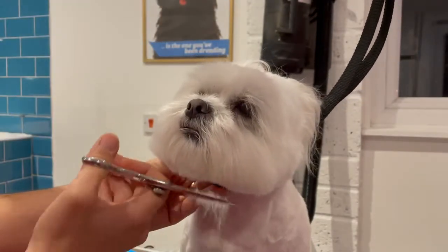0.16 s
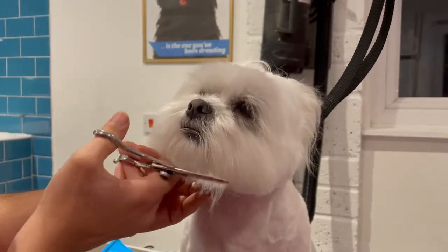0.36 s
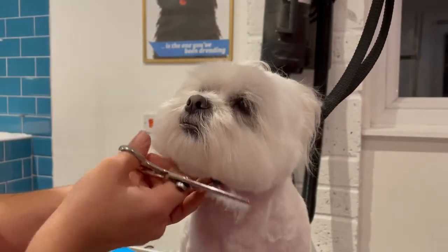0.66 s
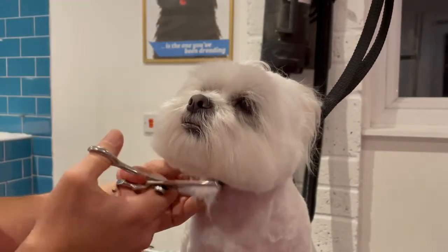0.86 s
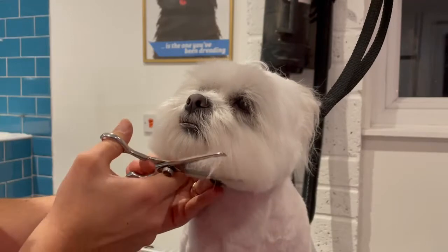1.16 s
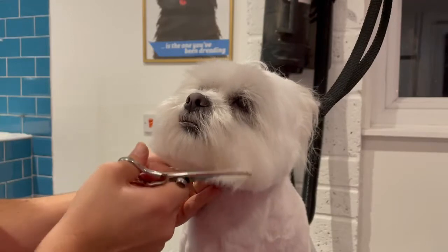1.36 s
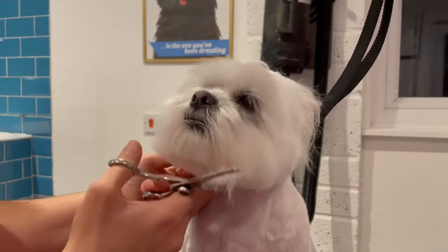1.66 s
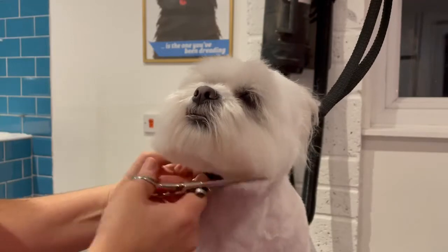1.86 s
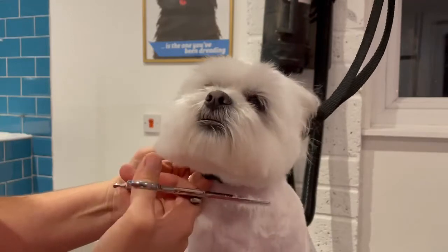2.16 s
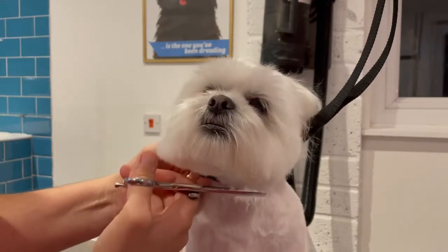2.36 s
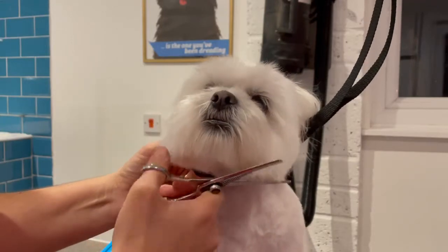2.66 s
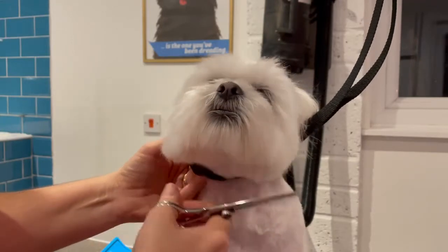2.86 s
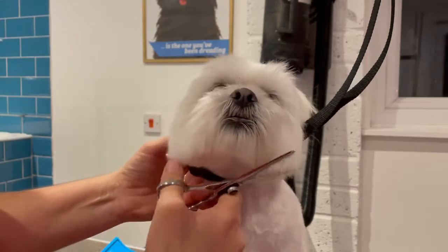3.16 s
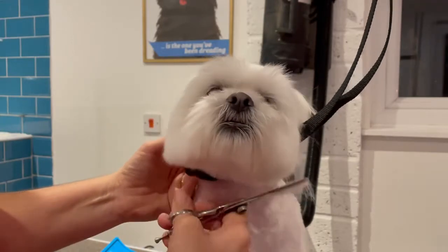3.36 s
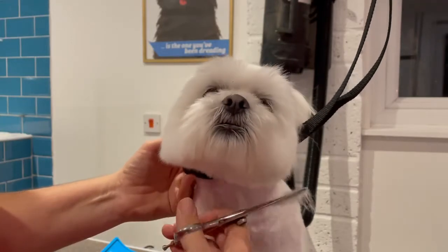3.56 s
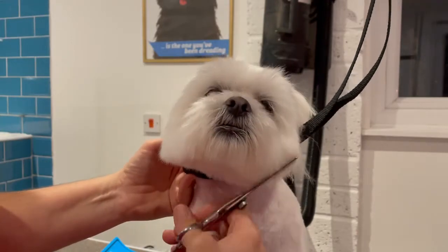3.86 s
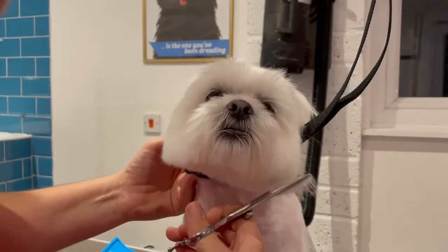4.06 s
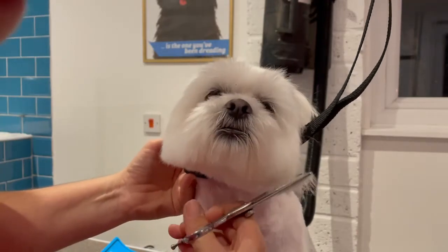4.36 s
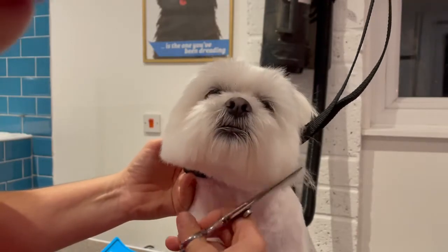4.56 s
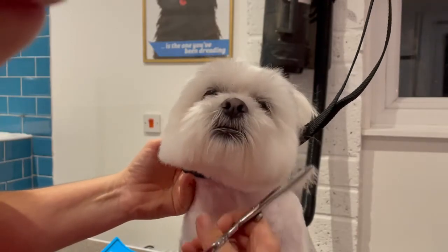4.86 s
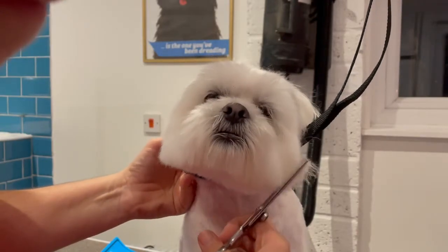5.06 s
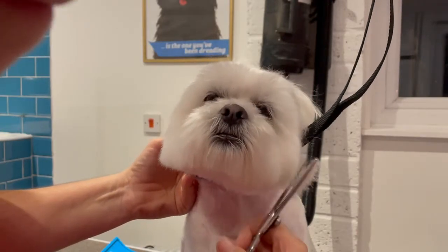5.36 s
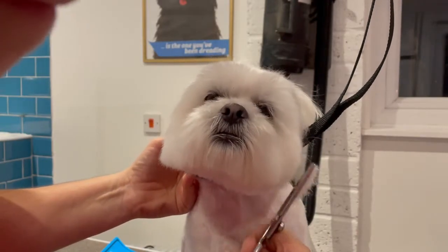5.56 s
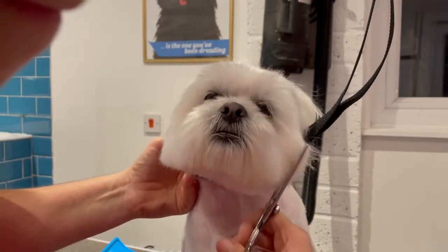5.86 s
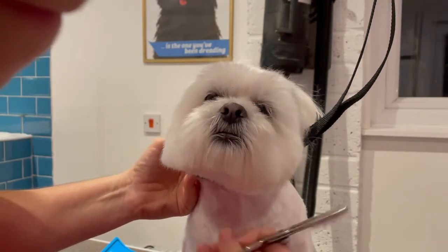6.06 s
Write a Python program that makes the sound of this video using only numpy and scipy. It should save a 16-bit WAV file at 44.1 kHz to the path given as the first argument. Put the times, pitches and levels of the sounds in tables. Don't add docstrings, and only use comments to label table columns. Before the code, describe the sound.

Sharp metallic scissor snips crunch through fine fur, ten spaced cuts with light opening scrapes, dull handle knocks and tiny clinks in a quiet tiled room.

```python
import sys
import numpy as np
from scipy import signal
from scipy.fft import rfft, irfft, next_fast_len
from scipy.io import wavfile
from scipy.ndimage import uniform_filter1d

SR = 44100
rng = np.random.default_rng(int(sys.argv[2]) if len(sys.argv) > 2 else 0)


def transcribe(u):
    v = np.clip(np.atleast_2d(u).T, -1, 1)
    q = np.round(v * 32767).astype(np.int16)
    wavfile.write(sys.argv[1], SR, q)


def field_ratio(decibels):
    return 10 ** (np.asarray(decibels, dtype=float) / 20)


N = 274302


def evened(x):
    return x / np.sqrt(np.mean(x ** 2) + 1e-20)


def read(points, hz):
    f, value = np.transpose(points)
    return np.interp(np.log(hz + 1), np.log(f + 1), value)


def along(curve):
    return np.interp(np.arange(N) / SR, *np.transpose(curve))


def add(mix, s, sound):
    part = mix[round(s * SR):][:len(sound)]
    part += sound[:len(part)]


def wander(size):
    knots = rng.standard_normal(N // size + 2)
    return np.interp(np.arange(N) / size, np.arange(len(knots)), knots) * 0.79


def wash(spectrum, level_db, patchy_db, size):
    frames, hz = 4 * N // size + 5, np.fft.rfftfreq(size, 1 / SR)
    draw = rng.standard_normal((5, frames, len(hz)), dtype=np.float32)
    patches = uniform_filter1d(uniform_filter1d(draw[4], size=10, axis=1), size=8, axis=0)
    colour = field_ratio(read(spectrum, hz) + patchy_db * evened(patches))
    z = (draw[:2] + 1j * draw[2:4]) * colour
    noise = signal.istft(z, nperseg=size, noverlap=3 * size // 4, time_axis=1, freq_axis=2)[1]
    return evened(noise[:, :N]) * field_ratio(level_db)


# f/Hz, level/dB per Hz
RUMBLE_COLOUR = [(28, -81), (37, 5), (47, -10), (60, -9.5), (85, -14.5), (120, -28), (200, -45), (400, -75)]
# t/s, level/dB
BUILDING_SWELL = [(0.0, -80), (0.08, -71), (0.22, -88), (0.26, -66), (0.69, -84.5), (0.73, -68),
                  (0.81, -79.5), (2.48, -62), (2.55, -65.5), (3.33, -56), (4.42, -64.5), (5.01, -60),
                  (5.26, -68), (5.3, -56), (5.37, -62.5), (5.94, -59.5), (6.08, -70), (6.22, -53)]


def rumble():
    level_db = along(BUILDING_SWELL) + 3.5 - 1.2 * wander(size=5000)
    return wash(RUMBLE_COLOUR, level_db, 1.57, size=4096)


# f/Hz, level/dB per Hz
HISS_COLOUR = [(200, -2), (700, -1), (1400, -3.5), (2400, 0.5), (3500, -6), (6500, -9.5), (9000, -4.5),
               (11000, -7.5), (15000, -8), (17000, -22)]
# t/s, level/dB
HAND_MOTION = [(0.0, -76), (0.05, -63), (0.24, -77.5), (0.52, -76), (1.28, -74.5), (1.4, -73), (2.16, -68),
               (2.46, -64), (2.98, -67.5), (3.45, -65), (4.45, -69.5), (4.71, -65), (5.01, -61),
               (5.68, -73), (5.8, -67), (6.22, -57)]


def hiss():
    steady_db, sweep_db, sweep_s, follows = -72.5, 18, 0.43, 0.1
    t, hands_db = np.arange(N) / SR, along(HAND_MOTION)
    arm_db = sweep_db * np.exp(-(t / sweep_s) ** 2)
    motion_db = follows * (hands_db - hands_db.mean())
    return wash(HISS_COLOUR, steady_db + arm_db + motion_db, 1.43, size=512)


# f/Hz, level/dB per Hz
RUSTLE_COLOUR = [(60, -32), (130, 2), (300, -6), (600, -9), (1200, -13.5), (2500, -24), (5000, -112)]


def rustle():
    return wash(RUSTLE_COLOUR, along(HAND_MOTION) + 2.5, 3.5, size=1024)


# f/Hz, t60/s
ROOM_DECAY = [(300, 0.47), (1500, 0.48), (4000, 0.4), (8000, 0.39), (14000, 0.22)]


def room(x, wet_db, scatter_s=0.001):
    slots = np.arange(200, SR // 2 - 20, 20)
    at = slots + rng.integers(0, 20, (2, len(slots)))
    taps = np.zeros((2, SR // 2))
    np.put_along_axis(taps, at, rng.choice([-1., 1.], at.shape), axis=1)
    hz, t, z = signal.stft(taps, SR, nperseg=256)
    decay = field_ratio(-60 * t / read(ROOM_DECAY, hz)[:, None])
    tail = signal.istft(z * decay, SR, nperseg=256)[1]
    tail *= field_ratio(wet_db) / np.linalg.norm(tail[0])
    scatter = rng.standard_normal(200) * np.exp(-np.arange(200) / SR / scatter_s)
    tail[0, 0] += 1
    tail[1, :200] += scatter / np.linalg.norm(scatter)
    return signal.fftconvolve(x[None], tail, axes=1)[:, :N]


def rattle(hz, t60, width, strike, size=8000):
    shake = rng.standard_normal(size) * field_ratio(-60 * np.arange(size) / SR / t60)
    shake[0] = strike
    r, turn = np.exp(-np.pi * width / SR), 2 * np.pi * hz / SR
    gain = 2 * (1 - r) ** 0.75 * np.sin(turn)
    section = [gain, 0, 0, 1, -2 * r * np.cos(turn), r * r]
    return signal.sosfilt([section, section], shake)


# f/Hz, level/dB, t60/s
CLASP_LOW_MODES = [(2397, -5.5, 1), (2553, -13.5, 0.12), (4530, 3, 0.057), (5360, -6, 0.11),
                   (5630, -7.5, 0.36), (5830, 0, 0.29), (6770, -5, 0.13)]
# f/Hz, level/dB, t60/s
CLASP_HIGH_MODES = [(8060, -22, 0.42), (9100, 4, 0.24), (10200, -15.5, 0.16), (9740, -3, 0.45),
                    (10200, -29, 0.1), (11300, -20, 0.066)]
# t/s, peak level/dB, upper modes level/dB, damping/factor
CLASP_CLINKS = [(1.9999, -46, 11.5, 9.9), (2.2044, -47.5, 12, 2.1), (2.4064, -52, 11, 1.2),
                (2.7574, -49.5, 11, 1.1), (3.1394, -51, 5.5, 1.1), (3.4706, -63.5, 12, 1.2),
                (3.9675, -62.5, 14, 3.2), (4.1026, -52, 9.5, 2.9), (4.6169, -48.5, 10, 4.3),
                (4.8, -57.5, -7, 2.3), (4.993, -51, 9, 2.7), (5.5599, -49, 11, 1.4),
                (6.0548, -46.5, 5, 2.3)]


def clasp():
    jangle_db, jangle_s = -17, 0.17
    out, modes = np.zeros(N), CLASP_LOW_MODES + CLASP_HIGH_MODES
    shares = rng.standard_normal((len(CLASP_CLINKS), len(modes)))
    for (s, db, high_db, damping), luck in zip(CLASP_CLINKS, shares):
        for k, (hz, mode_db, t60) in enumerate(modes):
            upper_db = high_db * (k >= len(CLASP_LOW_MODES))
            start_db = db - 14.0 + mode_db + 2.2 * luck[k] + upper_db
            add(out, s, field_ratio(start_db) * rattle(hz, t60 / damping, 250, 31.2))
        jangle = rattle(hz=6400, t60=jangle_s / damping, width=6500, strike=20.0)
        add(out, s, field_ratio(db + jangle_db) * jangle)
    return out


def blow(db, hz, t60, puff_share, sag, size=6000):
    t, noise = np.arange(size) / SR, rng.standard_normal(size)
    pitch = hz * (1 + sag * np.exp(-t / 0.003))
    tone = np.sin(2 * np.pi * np.cumsum(pitch) / SR)
    puff = evened(uniform_filter1d(noise, size=24) - uniform_filter1d(noise, size=150))
    onset = 1 - np.exp(-t / 0.00069)
    return field_ratio(db - 60 * t / t60) * onset * (tone + puff_share * puff)


# t/s, peak level/dB, pitch f/Hz, t60/s
RING_THUDS = [(0.533, -53.5, 692, 0.043), (1.246, -45, 127, 0.058), (1.298, -49.5, 847, 0.1),
              (1.795, -55.5, 202, 0.048), (2.408, -47.5, 197, 0.14), (2.758, -54, 348, 0.14),
              (3.255, -53.5, 640, 0.17), (4.552, -42, 279, 0.056), (4.986, -38.5, 278, 0.043),
              (5.468, -49.5, 290, 0.099), (5.867, -49, 458, 0.12), (6.133, -46, 242, 0.22),
              (6.153, -53, 110, 0.18), (6.186, -54, 104, 0.057), (6.165, -68, 314, 0.081)]


def thuds():
    out = np.zeros(N)
    for s, db, hz, t60 in RING_THUDS:
        add(out, s, blow(db, hz, t60, 0.6, 0.91))
    return out


# t/s, peak level/dB, pitch f/Hz, t60/s, blade ring level/dB
HANDLE_KNOCKS = [(1.287, -48.5, 1295, 0.12, -41), (1.781, -44.5, 1166, 0.12, -47),
                 (2.744, -44.5, 612, 0.081, -47.5), (3.257, -38, 138, 0.028, -45),
                 (3.969, -52, 141, 0.081, -76), (4.546, -33, 287, 0.016, -44),
                 (4.908, -44.5, 125, 0.041, -71), (5.465, -40, 1396, 0.038, -45.5),
                 (5.636, -54, 158, 0.061, -76), (5.857, -44, 1435, 0.08, -39),
                 (6.133, -48.5, 111, 0.11, -86)]


def knocks():
    out = np.zeros(N)
    for s, db, hz, t60, ring_db in HANDLE_KNOCKS:
        add(out, s, blow(db, hz, t60, 0.67, 0.34))
        low_ring = rattle(hz=3500, t60=0.28, width=480, strike=4.0)
        high_ring = rattle(hz=9800, t60=0.53, width=700, strike=4.0)
        add(out, s, field_ratio(ring_db - 7.0) * (low_ring + 0.41 * high_ring))
    return out


# bite t/s, cut length t/s, level at the stop/dB, swell level/dB, release t/s
FUR_CUTS = [
    (0.483, 0.024, -45, 11.5, 0.092),
    (1.251, 0.039, -27.5, 22, 0.015),
    (1.752, 0.042, -31.5, 14.5, 0.016),
    (2.697, 0.026, -34.5, 22.5, 0.072),
    (3.225, 0.033, -33.5, 1.5, 0.013),
    (3.732, 0.033, -41.5, 4, 0.051),
    (4.507, 0.0414, -31.5, 5, 0.011),
    (4.932, 0.032, -40.5, -4, 0.019),
    (5.437, .016, -33.5, 0.5, 0.06),
    (5.827, 0.028, -30.5, 8, 0.069),
]
# start t/s, slide length t/s, level/dB, swell level/dB, bite level of the lowest modes/dB
BLADE_OPENINGS = [(0.736, 0.05, -54.5, 0.5, -5.5), (0.973, 0.044, -64.5, 4, -1.5),
                  (1.474, 0.021, -50.5, 9, -9.5), (1.954, .024, -47, -1.5, -14.5),
                  (2.895, 0.019, -43, 9, -14.5), (3.427, 0.033, -45.5, 3.5, -21.5),
                  (3.963, .004, -43, 13, -18), (4.687, .02, -40, -2, -23.5),
                  (4.982, 0.0023, -41.5, -14, -4), (5.129, 0.025, -41, 17, -13.5),
                  (5.626, 0.022, -39, 16, -15.5), (6.036, 0.03, -51, 0.5, -5.5)]
LOW_BITE_SHAPE = (5, 6, -2, 2.5, 3, -12)
SPINE_STAGES = (-22, -20, -13, -11, -7, -8.5)
# t/s, middle modes level/dB
BLADE_FACING = [(0.5, 9), (1.8, 5.5), (2.7, 4), (4.0, 0), (5.1, 0.5), (5.9, 0)]


def strokes():
    cut_lead_s, open_lead_s, open_release_s, drag_s = 0.026, 0.0078, 0.05, 0.11
    apart_db, touch_db, slack_db, drag_db = -88, -64, -74, -77
    approach = 1.5
    rows = []
    for start, length, db, swell_db, release in FUR_CUTS:
        bite_db = -13 + 0.05 * (db + 45.5)
        rows.append((start, length, db, swell_db, cut_lead_s, release, bite_db))
    for start, length, db, swell_db, bite_db in BLADE_OPENINGS:
        rows.append((start, length, db, swell_db, open_lead_s, open_release_s, bite_db))
    levels, travel, t = np.zeros((3, N)), np.zeros(N), np.arange(N) / SR
    for start, length, db, swell_db, lead, release, bite_db in rows:
        steps = [-lead - approach * lead, approach * lead, lead, length, release, drag_s]
        s = start + np.cumsum(steps)
        level_db = np.array([apart_db, touch_db, db - swell_db, db, slack_db, drag_db])
        span = slice(round(s[0] * SR), round(s[-1] * SR))
        spine_db = SPINE_STAGES + np.interp(start, *np.transpose(BLADE_FACING))
        groups_db = (0, spine_db, np.add(LOW_BITE_SHAPE, bite_db))
        levels[:, span] += [field_ratio(np.interp(t[span], s, level_db + share_db)) for share_db in groups_db]
        travel[span] = np.interp(t[span], s[[0, -1]], [-1, 1])
    return levels, travel


def resonate(x, turns, width):
    spin, r = np.exp(2j * np.pi * turns), np.exp(-np.pi * width / SR)
    gain = np.sqrt(2 * (1 - r ** 2) ** 3 / (1 + r ** 2))
    smooth = signal.lfilter([1], np.poly([r, r]), x * spin.conj())
    return gain * (spin * smooth).real


# t/s, peak level/dB, lower modes level/dB
EDGE_CATCHES = [(0.4973, -22, -31), (0.741, -17, -21), (1.0138, -79, -21), (1.2555, -20, -15),
                (1.277, -34, -20), (1.2895, -10, -23), (1.4945, -20.5, -25), (1.757, -36, -35),
                (1.7863, -4, -22), (3.2543, -32, -22), (1.954, -42, -15), (2.7176, -32, -26),
                (2.8935, -19.5, -12), (2.9096, -20, -24), (3.2201, -45, -29), (3.4271, -39, 8),
                (5.1385, -23, -19), (3.7154, -21.5, -8), (3.7469, -15.5, -37), (3.9705, -8.5, -31),
                (0.537, -22, -24), (4.6807, -18.5, -28), (4.6902, -24, -14), (4.9087, -30, -30),
                (4.9287, -20, -27), (4.9604, -31, -29), (5.4634, -15.5, -2.5), (5.6363, -19, -15),
                (6.0413, -22, -2.5), (6.1276, -18, 1)]
# f/Hz, width f/Hz, level/dB
EDGE_RESONANCES = [(9060, 1600, -13.5), (9750, 1700, 1), (10850, 1020, 1), (11620, 250, -7.5),
                   (11880, 1080, -1), (13150, 490, 2), (14770, 1200, -1), (15800, 390, -11.5)]
# f/Hz, width f/Hz, level/dB
SPINE_RESONANCES = [(5860, 2500, -1), (6630, 670, -1.5), (7540, 790, 3)]
# f/Hz, width f/Hz, level/dB
BLADE_RESONANCES = [(1176, 2400, -4.5), (2153, 980, -5), (3006, 160, -23), (3596, 1400, 0)]


def shears(snap_share=0.11, spread_db=2.0, patch_db=5, glide=0.042, tick_db=-3):
    (levels, travel), catches = strokes(), np.zeros((3, N))
    signs = rng.choice([-1., 1.], (len(EDGE_CATCHES), 60))
    scratches = np.exp(-np.arange(60) / 4.0) * signs
    for (s, db, low_db), scratch in zip(EDGE_CATCHES, scratches):
        for catch, share_db in zip(catches, (0, low_db, low_db)):
            add(catch, s, field_ratio(db + share_db + tick_db) * scratch)
    snap_sizes = field_ratio(spread_db * rng.exponential(1, N))
    snaps = snap_sizes * (rng.random(N) < snap_share) * rng.choice([-1., 1.], N)
    clumps = field_ratio(5.0 * wander(size=70))
    seconds, out = np.cumsum(1 + glide * travel) / SR, np.zeros(N)
    groups = (EDGE_RESONANCES, SPINE_RESONANCES, BLADE_RESONANCES)
    for modes, level, catch in zip(groups, levels, catches):
        for hz, width, db in modes:
            grit = np.roll(snaps, rng.integers(N)) * clumps * field_ratio(patch_db * wander(size=300))
            out += field_ratio(db - 7.0) * resonate(level * evened(grit) + catch, hz * seconds, width)
    return out


def scene():
    background = rumble() + hiss() + rustle()
    clinks = room(clasp(), wet_db=-1.5)
    scissors = room(thuds() + knocks() + shears(), wet_db=-10.5)
    return background + clinks + scissors


def top_cut(x):
    return signal.sosfilt(signal.butter(12, 16640, fs=SR, output="sos"), x)


# f/Hz, likeness/0-1
PORT_LIKENESS = [(50, .97), (200, .85), (700, .58), (2000, .66), (5500, .7), (7300, .98), (14500, .98),
                 (15700, .9)]
# f/Hz, phase/half turns
PORT_LEAD = [(60, 0), (5600, .1), (6500, -.3), (7300, -.7), (7900, -.97), (8650, -1.04), (9700, -1.45),
             (10800, -1.95), (12000, -2.02), (12800, -2.3), (13900, -2.95), (16500, -3.03)]
# f/Hz, level/dB
PORT_TILT = [(60, 1.5), (300, -0.5), (700, 5), (2000, 3), (4500, 2.5), (6500, 1), (7500, 1), (16000, 0)]


def record(dry):
    size = next_fast_len(N + 4096)
    hz, fields = np.fft.rfftfreq(size, 1 / SR), rfft(dry, size)
    a, b = fields / (1 + (38. / (hz + 1)) ** 8)
    same = np.clip(read(PORT_LIKENESS, hz), 0, 1)
    tilt = field_ratio(read(PORT_TILT, hz) / 2)
    blend = same * a + np.sqrt(1 - same ** 2) * b
    right = blend * np.exp(-1j * np.pi * read(PORT_LEAD, hz)) / tilt
    ports = irfft(np.array([a * tilt, right]), size)[:, :N]
    self_noise = uniform_filter1d(rng.standard_normal((2, N)), size=2)
    ports = ports + field_ratio(-74) * self_noise
    ports = signal.oaconvolve(ports, signal.firwin(255, 16150, fs=SR)[None], "same")
    return top_cut(ports)


dry = scene()
out = record(dry)
transcribe(out)
```